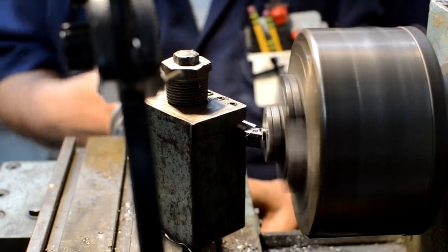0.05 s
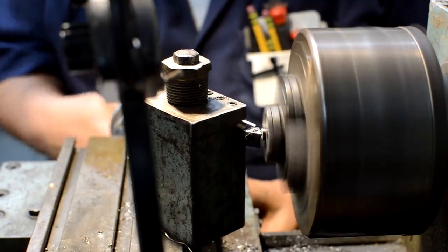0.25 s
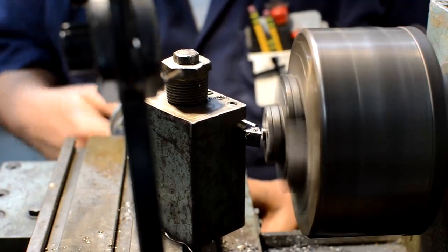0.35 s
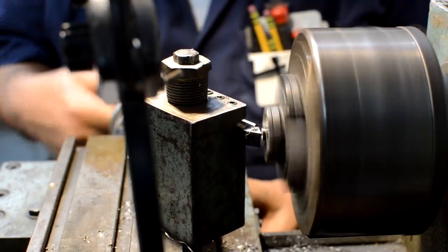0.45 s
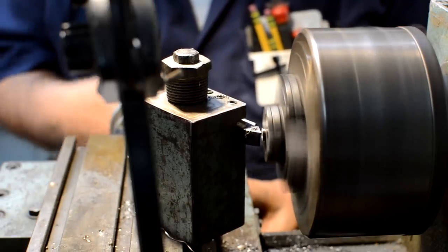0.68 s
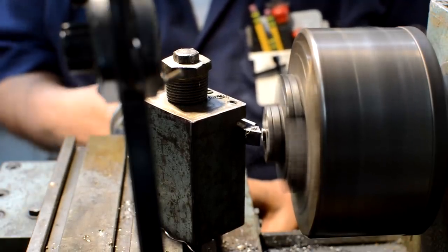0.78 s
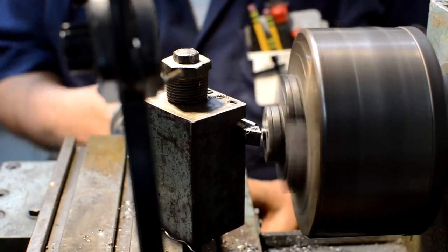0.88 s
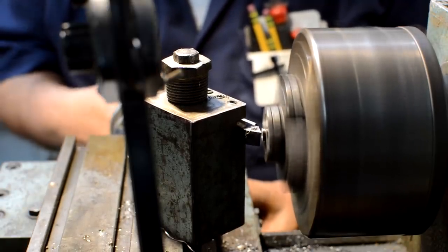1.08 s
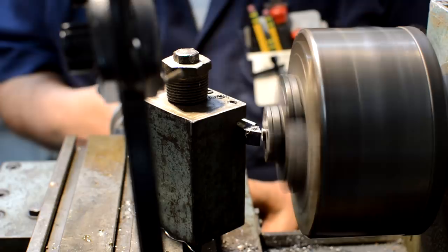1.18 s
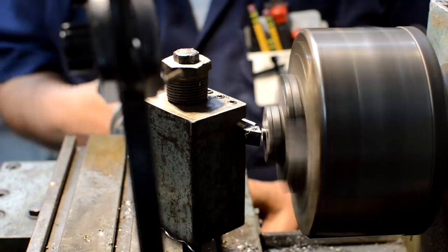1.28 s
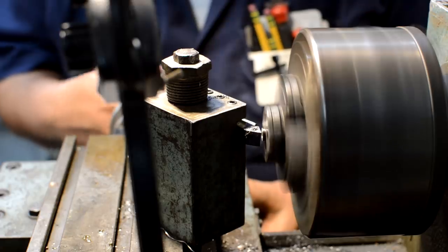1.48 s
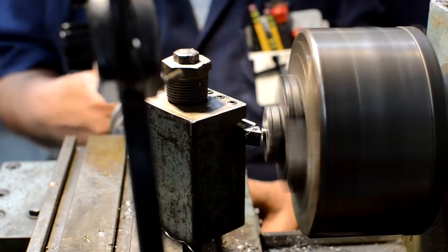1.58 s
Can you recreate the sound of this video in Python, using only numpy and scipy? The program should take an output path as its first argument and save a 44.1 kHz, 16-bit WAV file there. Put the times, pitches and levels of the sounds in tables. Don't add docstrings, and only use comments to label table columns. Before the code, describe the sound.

A metal lathe hums and whines with rattling gears while its tool briefly squeals cutting steel

```python
import sys
import numpy as np
from scipy import signal
from scipy.fft import rfft, irfft, next_fast_len
from scipy.io import wavfile
from scipy.ndimage import uniform_filter1d, map_coordinates

SR = 44100
rng = np.random.default_rng(int(sys.argv[2]) if len(sys.argv) > 2 else 0)


def waveform_to_disk(signal):
    frames = np.transpose(np.atleast_2d(signal))
    scaled = np.clip(frames, -1, 1) * 32767
    samples = np.round(scaled).astype(np.int16)
    wavfile.write(sys.argv[1], SR, samples)


def amplitude_ratio(level_db):
    exponent = np.asarray(level_db, float) / 20
    return 10 ** exponent


N = 72765
TIME = np.arange(N) / SR
TURN_HZ, TEETH = 11.068, 56
TURN = round(SR / TURN_HZ)


def unit(x):
    return x / np.sqrt(np.mean(x ** 2) + 1e-20)


def curve(rows, outside=None):
    return np.interp(TIME, *np.transpose(rows), left=outside, right=outside)


def level(rows):
    return amplitude_ratio(curve(rows, outside=-150))


def bumps(centre_s, length_s, level_db):
    distance = (TIME - centre_s[:, None]) / length_s[:, None]
    return amplitude_ratio(level_db) @ np.exp(-(3 * distance) ** 2)


def wobble(rate_hz):
    points = rng.standard_normal(int(N * rate_hz / SR) + 4)
    return map_coordinates(points, [TIME * rate_hz])


def filtered(x, response):
    size = next_fast_len(N + SR // 2)
    spectrum = rfft(x, size) * response(np.fft.rfftfreq(size, 1 / SR))
    return irfft(spectrum, size)[:N]


def resonant(x, peaks):
    def response(f):
        total = 0
        for k, (hz, width, db) in enumerate(peaks):
            sign = (-1) ** k
            total = total + sign * amplitude_ratio(db) * 1j * f * width / (hz * hz - f * f + 1j * f * width)
        return total
    return unit(filtered(x, response))


def narrow(hz, width_hz):
    peak = [(hz, width_hz, 0)]
    return resonant(resonant(rng.standard_normal(N), peak), peak)


def tone(hz, db, phase):
    return np.sqrt(2) * amplitude_ratio(db) * np.cos(2 * np.pi * hz * TIME - phase)


def add_ring(out, start_s, hz, db, t60, rise_s):
    t = np.arange(SR // 10) / SR
    fade = np.sqrt(2) * amplitude_ratio(db - 60 * t / t60) * (1 - np.exp(-t / rise_s))
    out[round(start_s * SR):][:len(t)] += fade * np.sin(2 * np.pi * hz * t)


def motor():
    # pitch_hz [Hz], level_db [dB rms]
    hum = [(120, -57), (156.8, -68), (203.6, -61), (360, -69), (407.3, -67), (432.1, -68), (480, -66),
           (497.5, -66), (762.7, -67), (839, -68), (1042, -68), (675.7, -60), (791.8, -65), (973.7, -67)]
    # pitch_hz [Hz], level_db [dB rms]
    beat = [(720.2, -51), (733.6, -48)]
    # start_s [s], level_db [dB]
    drone = [(0.0, -42), (0.032, -41.5), (0.118, -47), (0.826, -48.5), (0.95, -41.5), (1.378, -42.5),
             (1.456, -47), (1.65, -46)]
    beat_peak_s, drone_hz = 1.188, 240.1
    lines = sum(tone(hz, db + 0.27 * wobble(10), 2 * np.pi * rng.random()) for hz, db in hum)
    pair = sum(tone(hz, db + .5 * wobble(6.25), 2 * np.pi * hz * beat_peak_s) for hz, db in beat)
    return lines + pair + tone(drone_hz, curve(drone), 0)


def gear_whine():
    # distance from the mesh tone [shaft turn rates], level_db [dB rms]
    mesh = [(-2, -61), (-1, -62), (0, -48.5), (1, -68), (2, -61), (3, -63)]
    mesh_peak_s = 0.057
    spindle_hz, spindle_db, spindle_peak_s = 5.9, -61, 1.345
    whine = np.zeros(N)
    for k, db in mesh:
        phase = 2 * np.pi * (k * TURN_HZ * mesh_peak_s + k % 2 / 4)
        whine += tone((TEETH + k) * TURN_HZ, db + .4 * wobble(6.05), phase)
    phase = -2 * np.pi * spindle_hz * spindle_peak_s
    return whine + tone(TEETH * TURN_HZ - spindle_hz, spindle_db, phase)


def gear_rattle():
    # pitch_hz [Hz], width_hz [Hz], level_db [dB]
    case = [(428, 60, -1), (678, 97, 1), (1218, 43, 3), (1545, 280, -7), (1881, 45, 6), (2022, 72, 5),
            (2360, 740, 2), (2906, 250, 4.5), (3148, 170, 1), (3956, 270, -3)]
    # first start_s [s], gain_db [dB], 60 dB fade t60 [s]
    lash = [
        (.0335, 6, .07),
        (.077, 4, .1),
    ]
    memory = 0.57
    turns = rng.standard_normal((N // TURN + 9, TURN))
    teeth = signal.lfilter([1], [1, -memory], turns, axis=0).ravel()[-N:]
    swell = 1
    for s, db, t60 in lash:
        since_slap_s = (TIME - s) % (TURN / SR)
        swell = swell + (amplitude_ratio(db) - 1) * amplitude_ratio(-60 * since_slap_s / t60)
    rattle = filtered(resonant(swell * teeth, case), lambda f: 1 / (1 + (f / 5000) ** 4))
    return amplitude_ratio(-46.5) * rattle


def gear_knocks():
    # first start_s [s], pitch_hz [Hz], level_db [dB], 60 dB fade t60 [s]
    knock_rows = [(.0335, 2350, -44, .04), (.034, 2800, -44, .035), (.035, 1992, -45, .11),
                  (.040, 3900, -55, .04), (.040, 2480, -47, .04), (.036, 3200, -53, .05),
                  (.051, 2050, -48, .04), (.055, 2390, -49, .05), (.077, 1880, -49, .09),
                  (.082, 2003, -46, .04), (.082, 2750, -48, .06), (.094, 2830, -48, .03),
                  (.110, 1870, -51, .04), (.058, 1220, -53, .08)]
    # start_s [s], gain_db [dB]
    load_rows = [
        (.15, 0),
        (.3, 2.5),
        (.62, 2.5),
        (.72, 0),
    ]
    load_above_hz, scatter_db, drift_s = 2300, .9, .00003
    load = np.pad(curve(load_rows)[TURN // 2::TURN], (0, 2))
    knocks = np.zeros(N + SR)
    for s, hz, db, t60 in knock_rows:
        size, late = rng.standard_normal((2, N // TURN + 1))
        for k, start in enumerate(s + drift_s * np.cumsum(late)):
            strength = db + scatter_db * size[k] + (hz > load_above_hz) * load[k]
            add_ring(knocks, start + k * TURN / SR, hz, strength, t60, rise_s=.0009)
    return knocks[:N]


def air():
    # pitch_hz [Hz], level_db [dB per Hz]
    colour = [(30, -13.5), (300, -2), (1500, -4.5), (4500, -12), (6200, -10.5), (7300, -1.5), (8600, -11.5),
              (13400, -41)]
    hz, db = np.transpose(colour)
    hiss = filtered(rng.standard_normal(N),
                    lambda f: amplitude_ratio(np.interp(np.log(f + 1), np.log(hz), db, right=-120)))
    return amplitude_ratio(-47 + 0.35 * wobble(18) + 0.38 * wobble(3.5)) * unit(hiss)


def flicking_chips():
    # start_s [s], pitch_hz [Hz], level_db [dB], 60 dB fade t60 [s]
    chip_rows = [
        (.0875, 6530, -31, 0.0053),
        (.109, 8100, -34, 0.01),
        (.143, 8550, -39, 0.018),
        (.171, 8100, -39, 0.012),
        (.602, 10600, -55, .03),
        (.668, 8600, -43, .03),
        (.671, 9500, -44, .025),
        (.674, 10700, -50, .02),
        (1.39, 7200, -46, .02),
    ]
    chips = np.zeros(N + SR)
    for s, hz, db, t60 in chip_rows:
        add_ring(chips, s, hz, db, t60, rise_s=0.00035)
    return chips[:N]


def cutting_hiss():
    # start_s [s], level_db [dB]
    pressure = [(.14, -70), (.15, -47), (.18, -46), (.195, -45), (.46, -42.5), (.49, -43.5), (.52, -43),
                (.638, -41.5), (.65, -47)]
    # centre_s [s], length_s [s], level_db [dB]
    scrapes = [
        (.147, .008, -45),
        (.159, .016, -43),
        (.170, .006, -44),
        (.196, .006, -45),
        (.672, .018, -41),
        (.888, .012, -60),
        (1.627, .01, -58),
    ]
    # pitch_hz [Hz], width_hz [Hz], level_db [dB]
    shank = [(6860, 970, -12.5), (7820, 500, -3), (8650, 580, -2), (9560, 250, -0.5), (10600, 870, -19)]
    grit = rng.standard_normal(N) * amplitude_ratio(2.5 * wobble(60) + 2.5 * wobble(300))
    return (level(pressure) + bumps(*np.transpose(scrapes))) * resonant(grit, shank)


def feed_rumble():
    feed_s = (.2, .3, .57, .63)
    feed = np.interp(TIME, feed_s, [0, 1, 1, 0]) * amplitude_ratio(-53)
    rumble = narrow(315, 70) + .6 * narrow(480, 90) + 1.1 * narrow(640, 105) + 0.37 * narrow(180, 68)
    return feed * rumble


def squeal():
    # centre_s [s], length_s [s], peak level_db [dB rms], pitch_hz [Hz]
    bursts = [(0.198, 0.019, -37, 9420), (0.236, 0.0073, -31, 9450), (.250, .010, -20.5, 9350),
              (.256, 0.013, -28, 9330), (0.269, 0.027, -35.5, 9300), (0.28, 0.0031, -27, 9400),
              (0.2853, 0.01, -16.5, 9300), (0.294, .011, -15, 9220), (.302, 0.01, -18, 9230),
              (0.3083, .010, -20.5, 9250), (0.3167, 0.0068, -16.5, 9250), (.3235, 0.0084, -14.5, 9180),
              (.327, 0.006, -20.5, 9200), (.3305, 0.0098, -14.5, 9240), (.335, .005, -26, 9250),
              (0.342, .005, -28, 9250), (0.345, 0.0031, -30, 9250), (.353, 0.01, -27, 9250),
              (.3585, 0.012, -25, 9300), (0.367, 0.0045, -20, 9300), (0.388, .04, -32.5, 9350),
              (0.421, 0.087, -47, 9300), (0.456, 0.042, -44, 9280)]
    s, length, db, hz = np.transpose(bursts)
    swell = bumps(s, length, db)
    pitch = np.interp(TIME, s, hz) + 30 * wobble(180)
    roughness = np.sqrt(2) * amplitude_ratio(.7 * wobble(300))
    ring = roughness * np.sin(2 * np.pi * np.cumsum(pitch) / SR)
    spray = resonant(rng.standard_normal(N), [(7570, 390, -5), (8880, 240, 11), (10000, 900, -7)])
    return swell * ring + amplitude_ratio(-16) * uniform_filter1d(swell, size=400) * spray


def whistles():
    # start_s [s], level_db [dB]
    tip = [(.18, -70), (.195, -45), (.23, -47), (.28, -42), (.36, -33.5), (.40, -40), (.462, -41.5),
           (.472, -46), (.50, -56)]
    # start_s [s], level_db [dB]
    chip = [
        (.5, -66),
        (.52, -42),
        (.55, -47),
        (.6, -47),
        (.632, -46),
        (.642, -67),
    ]
    return level(tip) * narrow(9350, 300) + level(chip) * narrow(8720, 200)


def scene():
    gears = gear_whine() + gear_rattle() + gear_knocks()
    cut = flicking_chips() + cutting_hiss() + feed_rumble()
    return (motor() + gears + air() + cut + squeal() + whistles())[None]


def roll_off(x):
    return signal.sosfilt(signal.butter(12, 13490, fs=SR, output="sos"), x)


def record(dry):
    mix = filtered(dry[0], lambda f: 1 / np.sqrt(1 + (f / 12300) ** 24))[None]
    return roll_off(mix)


dry = scene()
out = record(dry)
waveform_to_disk(out)
```